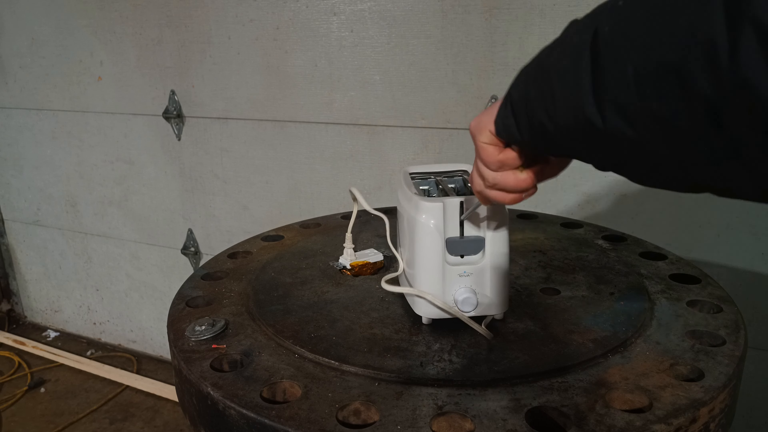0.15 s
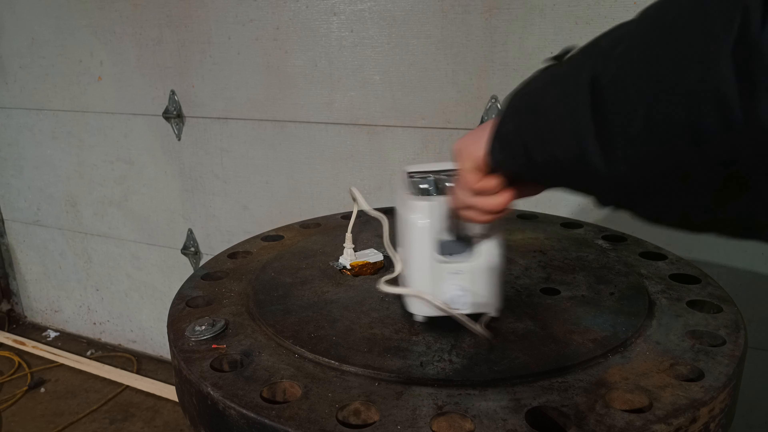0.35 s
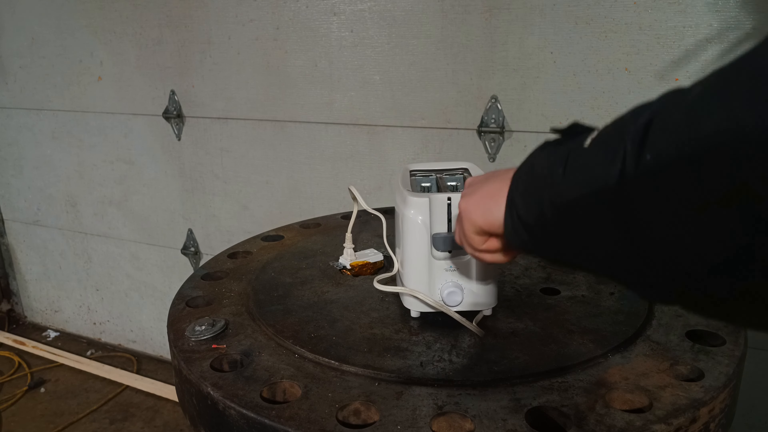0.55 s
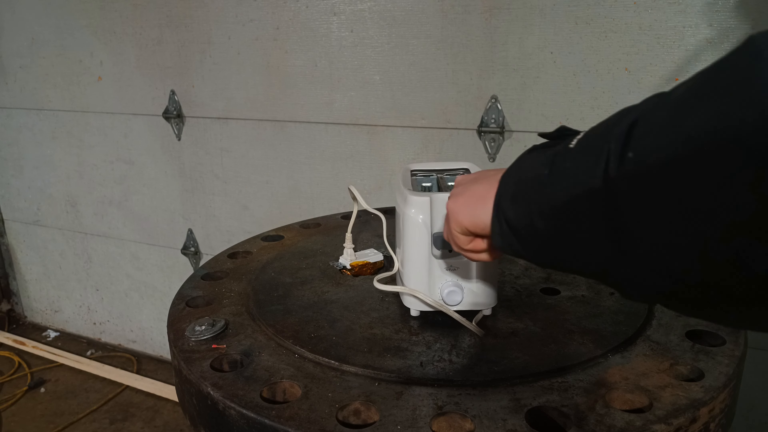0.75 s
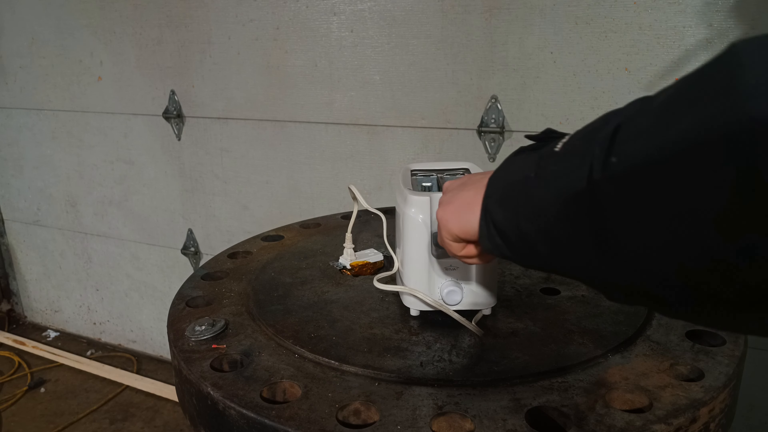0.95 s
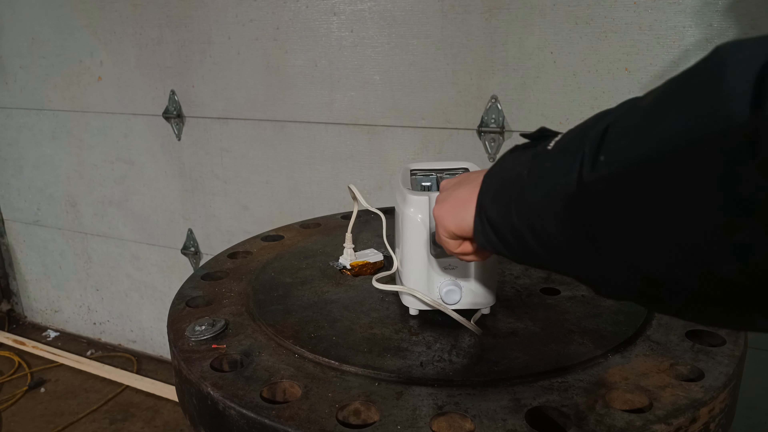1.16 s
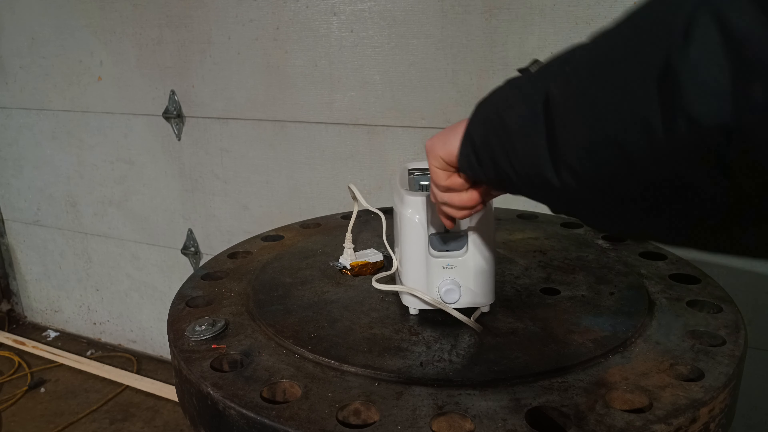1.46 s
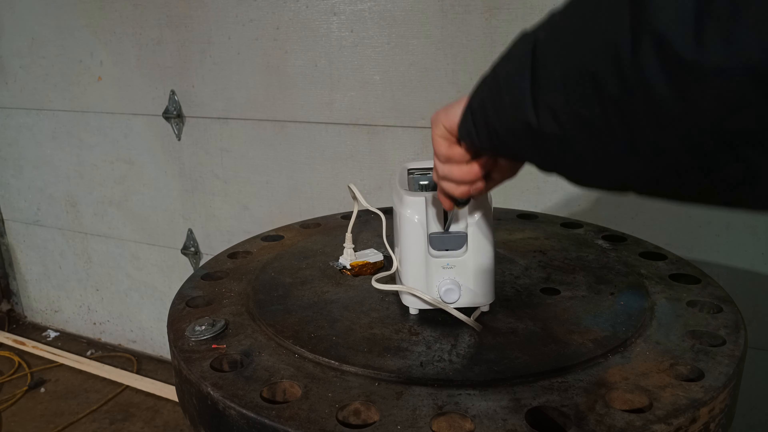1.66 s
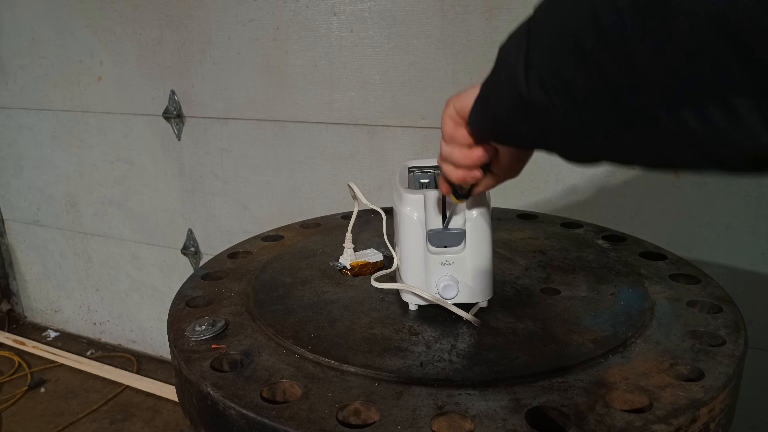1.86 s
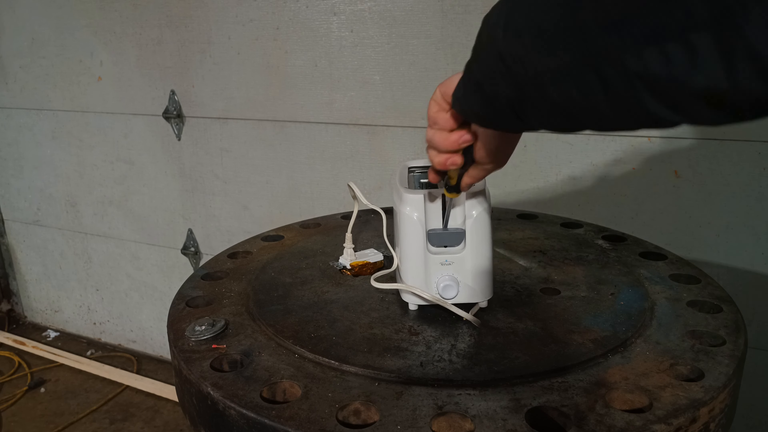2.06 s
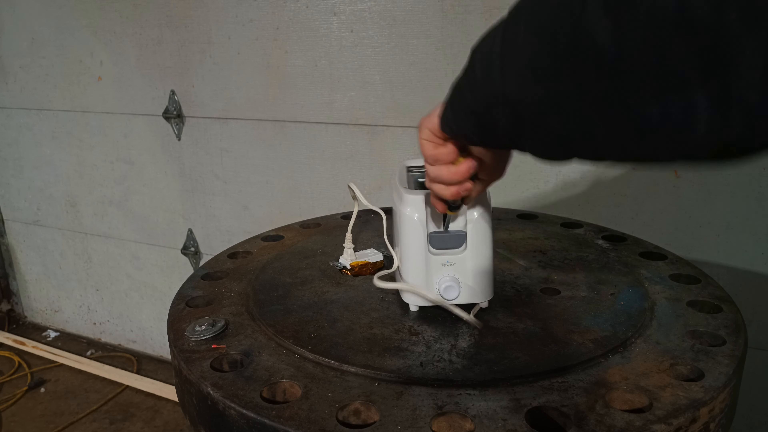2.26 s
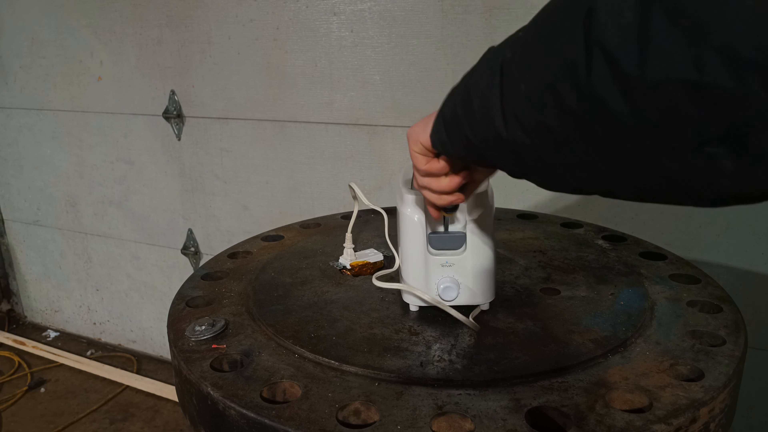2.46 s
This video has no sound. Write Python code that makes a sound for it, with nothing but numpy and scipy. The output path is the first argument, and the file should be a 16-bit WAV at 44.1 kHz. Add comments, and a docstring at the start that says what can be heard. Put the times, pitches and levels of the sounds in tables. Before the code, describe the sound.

A toaster lever is slammed down with loud rattling clacks, then snaps back up in a garage

```python
"""Faint hiss, a thin mains buzz and a slight scrape; then a hand slams the lever of a plastic toaster
that stands on a steel table in a garage. The carriage rattles and hits its stop, the latch ticks, the
lever clacks back up, then the hand brushes and pushes the case. Force pulses and random slips excite
decaying modes; short dense rings and a diffuse noise tail add table and room. Hiss is filtered noise, buzz is sines."""
import sys
import numpy as np
from scipy import signal
from scipy.fft import rfft, irfft
from scipy.io import wavfile

SR = 44100
rng = np.random.default_rng(int(sys.argv[2]) if len(sys.argv) > 2 else 0)


def bounce(signal):
    """Save signal as a 16-bit WAV file at the path given by the first command-line argument."""
    frames = np.transpose(np.atleast_2d(signal))
    limited = np.clip(frames, -1, 1)
    pcm = np.round(limited * 32767).astype(np.int16)
    wavfile.write(sys.argv[1], SR, pcm)


N = 114660
TIME = np.arange(N) / SR


def from_db(db):
    """Decibels to amplitude gain."""
    return 10 ** (np.asarray(db) / 20)


def unit_energy(x):
    """Scale each channel to an energy of one."""
    return x / np.sqrt(np.sum(x ** 2, axis=-1, keepdims=True) + 1e-20)


def at_hz(points, hz):
    """Interpolate a table on a log-frequency axis."""
    table_hz, values = np.transpose(points)
    return np.interp(np.log(np.maximum(hz, 1)), np.log(table_hz), values)


def convolve(x, response):
    """Pass a sound through a response, channel by channel, keeping its length."""
    full = signal.fftconvolve(np.atleast_2d(x), np.atleast_2d(response), axes=-1)
    return full[:, :np.shape(x)[-1]]


def high_pass(x, cutoff_hz):
    """Second-order Butterworth: removes the bass."""
    return signal.sosfilt(signal.butter(2, cutoff_hz, "high", fs=SR, output="sos"), x)


def pulse(points, share=1, size=2048):
    """Minimum-phase pulse: the shortest causal one with share times the tabled dB spectrum."""
    spectrum_db = share * at_hz(points, np.fft.rfftfreq(size, 1 / SR))
    cepstrum = irfft(np.log(from_db(spectrum_db)))
    # Folding the cepstrum makes the pulse causal
    cepstrum[1:size // 2] *= 2
    cepstrum[size // 2 + 1:] = 0
    return irfft(np.exp(rfft(cepstrum)))


def add(out, start_s, x):
    """Mix a short sound in at a time."""
    i = max(int(start_s * SR), 0)
    out[i:i + len(x)] += x[:max(N - i, 0)]


def dying_noise(t60_at, size, build_s, alike_hz):
    """Stereo noise, nearly flat, each half octave decaying at its own rate; channels agree in the bass."""
    t = TIME[:size]
    edges_hz = np.geomspace(40, 18000, 19)
    out = 0
    for low, high in zip(edges_hz, edges_hz[1:]):
        hz = np.sqrt(low * high)
        band = signal.butter(2, [low, high], "band", fs=SR, output="sos")
        noise = rng.standard_normal((2, 2 * len(t)))
        common, opposed = signal.sosfilt(band, noise)[:, len(t):]  # skip the filter's start-up
        alike = 1 / (1 + (hz / alike_hz) ** 4)
        pair = np.sqrt(1 + alike) * common + np.sqrt(1 - alike) * opposed * [[1], [-1]]
        envelope = from_db(-60 * t / t60_at(hz)) * (1 - np.exp(-t / build_s))
        out = out + unit_energy(pair * envelope) * np.sqrt(2 * (high - low) / SR)
    return out


LEFT_LAG_S = .00098


def microphones(x, balance):
    """Two spaced microphones of unlike colour; the left one is farther away, so it lags."""
    colours = [pulse(balance, 0.76), pulse(balance, -0.74)]
    left, right = convolve(np.broadcast_to(x, (2, N)), colours)
    return np.array([np.interp(TIME - LEFT_LAG_S, TIME, left, left=0), right])


# Air noise spectrum before scaling to AIR_DB: (freq_hz, relative_level_db)
AIR_SPECTRUM = [(24, -87), (40, -11), (542, -6), (733, -19.5), (1180, -15.5), (1590, -7.5), (3060, -8.5),
                (3560, -12), (10700, -8), (16000, -36.5)]
# Background colour, left +0.76 and right -0.74 of it: (freq_hz, balance_db)
AIR_BALANCE = [(100, 8), (600, -5), (1200, -8.5), (7000, 5.5), (11000, -10)]
# Mains buzz lines before waver and balance: (freq_hz, rms_level_db)
BUZZ_LINES = [(2280, -68), (3120, -65), (7620, -69), (7740, -68), (10980, -74)]
AIR_DB, BUZZ_WAVER = -59.5, .4  # rms level before balance; relative deviation


def background():
    """Hiss and rumble as filtered, partly shared noise; mains buzz as sines of wavering level."""
    noise = rng.standard_normal((2, N)) + 0.94 * rng.standard_normal(N)
    air = unit_energy(convolve(noise, pulse(AIR_SPECTRUM))) * np.sqrt(N)
    out = from_db(AIR_DB) * air
    waver_s = np.linspace(0, N / SR, 30)
    for hz, level_db in BUZZ_LINES:
        waver = 1 + BUZZ_WAVER * np.interp(TIME, waver_s, rng.standard_normal(30))
        line = np.sin(2 * np.pi * (hz * TIME + rng.random((2, 1))))
        out = out + from_db(level_db) * np.sqrt(2) * waver * line
    return microphones(out, AIR_BALANCE)


# Garage decay: (freq_hz, t60_s)
ROOM_T60 = [(100, 1.5), (300, 0.38), (1840, 0.6142), (4850, 0.4163), (12800, 0.31)]
# Garage tail colour: (freq_hz, level_db)
ROOM_COLOUR = [(100, -10), (400, 3.5), (650, -1.5), (1200, -6.5), (3000, -6.5), (7000, -3.5), (14000, -4.5)]
ROOM_ONSET_S, ROOM_BUILD_S, ROOM_ALIKE_HZ = .004, 0.016, 650


def garage(x):
    """Diffuse echoes from door, floor and walls, each band with its own decay."""
    tail = dying_noise(lambda hz: at_hz(ROOM_T60, hz), 2 * SR // 3, ROOM_BUILD_S, ROOM_ALIKE_HZ)
    tail = convolve(tail, pulse(ROOM_COLOUR))
    tail = np.pad(tail, ((0, 0), (int(ROOM_ONSET_S * SR), 0)))
    return convolve(x, tail)


FIRST_WAVE_DB, CRACK_DB, PANEL_DB = -9, -0.5, -3
CRACK_T60_S, PANEL_T60_S = 0.015, 0.13


def close_by(x):
    """First wave, a crack and a short dense ring from the panels and the table top."""
    crack = dying_noise(lambda hz: CRACK_T60_S, size=SR // 8, build_s=0.00019, alike_hz=3360)
    panels = dying_noise(lambda hz: PANEL_T60_S, size=SR // 8, build_s=0.0027, alike_hz=1320)
    rings = from_db(CRACK_DB) * crack + from_db(PANEL_DB) * panels
    return from_db(FIRST_WAVE_DB) * x + convolve(x, rings)


def mode(hz, t60_s):
    """Exponentially decaying cosine of height one."""
    t = TIME[:SR // 2]
    return from_db(-60 * t / t60_s) * np.cos(2 * np.pi * hz * t)


def resonance(hz, t60_s):
    """Mode scaled to a gain of one at its own pitch."""
    return 2 * np.log(1000) / (t60_s * SR) * mode(hz, t60_s)


T60_AT_1KHZ_S = 0.044


def part(hz):
    """Ring of the touched part; higher ones ring longer."""
    return resonance(hz, T60_AT_1KHZ_S * np.sqrt(hz / 1000))


# Frequencies of the force columns in the contact tables: freq_hz
FORCE_HZ = [150, 550, 1700, 4000, 9000]
TOP_LOSS_DB = 3


def contact(force_db):
    """Force pulse of one contact; it falls off further in the top octave."""
    top_slope_db = min(force_db[-1] - force_db[-2], 0)
    top = (2 * FORCE_HZ[-1], force_db[-1] + top_slope_db - TOP_LOSS_DB)
    return pulse([*zip(FORCE_HZ, force_db), top])


# Case and carriage modes, gains before the spread per contact: (freq_hz, gain_db, t60_s)
MODES = [(148.9, 2, 0.58), (289, -0.5, 0.11), (448.4, -1.5, 0.084), (528, -6, .12), (575.5, -3.5, 0.096),
         (615, 3.5, 0.1), (919.6, 10.5, .11), (1002, -0.5, 0.11), (1590, -1, .11), (2050, -0.5, 0.19),
         (3142, 4, 0.064), (4236, 2.5, 0.069), (7540, 4.5, 0.064)]
# Panel colour: (freq_hz, gain_db)
PANEL_COLOUR = [(120, -10.5), (250, -1), (600, 5.5), (800, -3.5), (1000, -0.5), (1270, 0), (1700, 1.5),
                (3100, 4.5), (3700, 1), (7500, 1), (16000, -15)]
MODE_SPREAD_DB, RADIATES_ABOVE_HZ = 2.5, 122


def toaster(force_db, ring=0, modes_db=0):
    """Answer to one contact: each stirs the modes differently; the case is too small for deep bass."""
    response = ring + signal.unit_impulse(SR // 2)
    for hz, gain_db, t60_s in MODES:
        spread_db = MODE_SPREAD_DB * rng.standard_normal()
        response = response + from_db(gain_db + modes_db + spread_db) * resonance(hz, t60_s)
    response = high_pass(response, RADIATES_ABOVE_HZ)
    coloured = convolve(response, pulse(PANEL_COLOUR))
    return convolve(coloured, contact(force_db))[0]


# Ticks and taps on the front face: (start_s, part_ring_hz,
# force_150hz_db, force_550hz_db, force_1700hz_db, force_4000hz_db, force_9000hz_db)
TICKS = [(.7832, 3064, -20, 6, -10.5, 0.5, -39), (.915, 4730, -14, -6, -17.5, -0.5, -5.5),
         (.970, 1552, -1, 2.5, -6, -1.5, -21.5), (1.059, 2020, -24, -15, -11.5, -9, -30),
         (1.186, 950, -33, -18, -5.5, -28, -40), (1.216, 150, -12, -15.5, -56, -56, -50),
         (2.3225, 752, -18, 6.5, 2, -49, -21), (2.458, 356, 2.5, -6, -20, -48, -49)]
TICK_T60_S, TICK_ROOM_DB, TICK_MODES_DB, TICK_RING_DB = 0.025, -7, 4.5, 9.5
TICK_BODY_DB, TICK_CRACK_DB = -6, -5


def ticks():
    """Short front-face contacts reach the microphones directly and stir the room little."""
    body = np.zeros(N)
    for start_s, ring_hz, *force_db in TICKS:
        ring = from_db(TICK_RING_DB) * part(ring_hz)
        add(body, start_s, toaster(force_db, ring, TICK_MODES_DB))
    crack = dying_noise(lambda hz: TICK_T60_S, size=SR // 8, build_s=0.00027, alike_hz=3550)
    direct = from_db(TICK_BODY_DB) * body + from_db(TICK_CRACK_DB) * convolve(body, crack)
    return direct, from_db(TICK_ROOM_DB) * garage(body)


# Scrapes, rattles and rubs: (start_s, strongest_s, end_s, part_ring_hz,
# force_150hz_db, force_550hz_db, force_1700hz_db, force_4000hz_db, force_9000hz_db)
SCRAPES = [(-.1, .02, 0.16, 580, -60, -53.5, -58.5, -51, -54.5),
           (.194, .204, 0.24, 393, -25, -33, -42, -48.5, -53),
           (.295, .352, 0.44, 2190, -28, -20.5, -19.5, -21.5, -24),
           (1.06, 1.10, 1.111, 445, -41, -42.5, -42.5, -54, -49.5),
           (1.262, 1.266, 1.305, 2550, -55, -59, -45.5, -47.5, -42.5),
           (1.435, 1.445, 1.565, 2740, -34.5, -37.5, -25, -43, -43),
           (1.836, 1.872, 1.908, 1814, -56, -37.5, -29, -30.5, -50.5),
           (1.862, 1.908, 1.904, 1006, -42.5, -34.5, -25, -35.5, -43.5),
           (2.218, 2.238, 2.29, 510, -68, -37, -39, -38, -43.5),
           (2.25, 2.29, 2.364, 790, -45, -33.5, -38, -35, -41.5),
           (2.345, 2.368, 2.43, 350, -37.5, -35, -36, -54, -54),
           (2.39, 2.412, 2.467, 980, -73, -49, -44, -40, -47)]
SLIPS_PER_S, SLIP_SPREAD_DB, SCRAPE_RING_DB = 1100, 2.5, 10.5


def scrapes(rows):
    """Sliding parts catch and slip at random under a force that swells and fades."""
    out = np.zeros(N)
    for start_s, strongest_s, end_s, ring_hz, *force_db in rows:
        sizes_db = SLIP_SPREAD_DB * np.minimum(rng.exponential(1, N), 4)
        sizes = from_db(sizes_db) * rng.choice([-1, 1], N)
        happens = rng.random(N) < SLIPS_PER_S / SR
        slips = unit_energy(sizes * happens) * np.sqrt(N)  # rms of one
        press = np.interp(TIME, [start_s, strongest_s, end_s], [0, 1, 0])
        ring = from_db(SCRAPE_RING_DB) * part(ring_hz)
        out += convolve(slips * press, toaster(force_db, ring))[0]
    return out


# Knocks of lever, latch and fingers: (start_s,
# force_150hz_db, force_550hz_db, force_1700hz_db, force_4000hz_db, force_9000hz_db)
KNOCKS = [(.2025, -14.5, 8, -3, -30, -40), (.2145, -3, 2.5, -25, -20, -26), (.245, -1, -14, -29, -37, -39),
          (.2875, 3, -38, 4, -4, 3.5), (.2937, 9.5, 14, 17, 16.5, 14), (.4295, 13.5, 14.5, 5, 7.5, -5),
          (.440, 9.5, 16, 15, 12, 8.5), (.553, -8, 5, -1, -4, -13), (.649, -16, -2.5, -14, -11, -25),
          (1.4295, -44, -28, -1, 1, -8), (1.4328, -3, -2, 8.5, 11.5, 4), (1.439, 1, 5.5, -6, -20, 5),
          (1.578, -23, -6.5, -6, -11, -32), (2.3305, -11, -11, -15, -4.5, -13.5)]


def knocks(rows):
    """Each knock is one pulse of force: dull for a finger, sharp for metal on metal."""
    out = np.zeros(N)
    for start_s, *force_db in rows:
        add(out, start_s, toaster(force_db))
    return out


# Direct colour, left +0.76 and right -0.74 of it: (freq_hz, balance_db)
DIRECT_BALANCE = [(300, 8), (650, 7), (1200, -4.5), (4000, -1), (7500, 1.5), (10000, -8.5)]
# Echo colour, same shares: (freq_hz, balance_db)
ROOM_BALANCE = [(600, 4.5), (3000, 6), (5000, -2.5), (7500, 8.5), (9500, -8.5)]


def scene(draws=2):
    """Knocks and scrapes are dealt alternately to two random draws of panel ring and garage tail."""
    direct, echoes = ticks()
    for draw in range(draws):
        body = knocks(KNOCKS[draw::draws]) + scrapes(SCRAPES[draw::draws])
        direct = direct + close_by(body)
        echoes = echoes + garage(body)
    toaster_sound = microphones(direct, DIRECT_BALANCE) + microphones(echoes, ROOM_BALANCE)
    return toaster_sound + background()


CUTOFF_HZ = 16200


def record(dry):
    """Soft saturation rounds the highest peaks; a steep low-pass cuts the top."""
    rounded = dry / (1 + dry ** 4) ** .25
    low_pass = signal.ellip(10, .2, 70, CUTOFF_HZ, fs=SR, output="sos")
    return signal.sosfilt(low_pass, rounded)


dry = scene()
out = record(dry)
bounce(out)
```